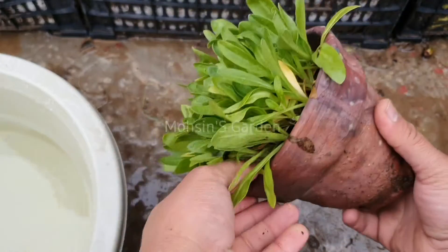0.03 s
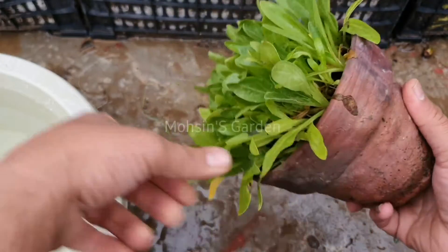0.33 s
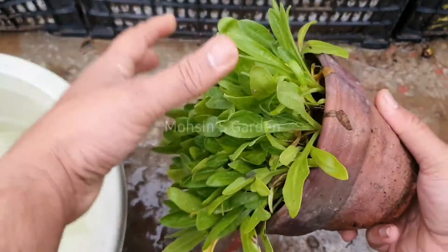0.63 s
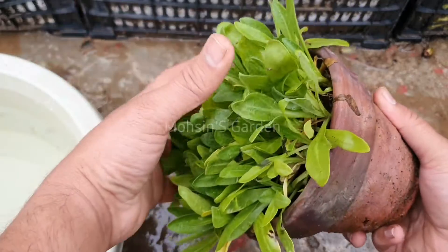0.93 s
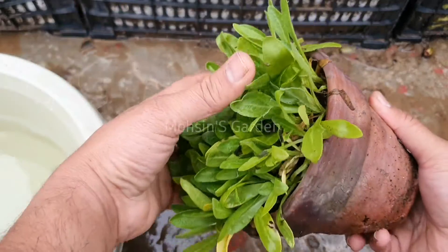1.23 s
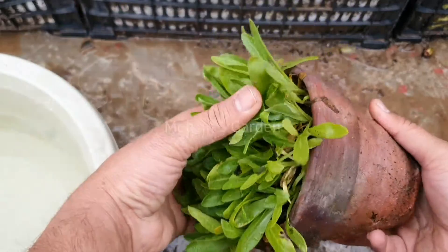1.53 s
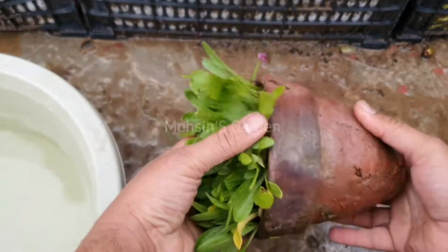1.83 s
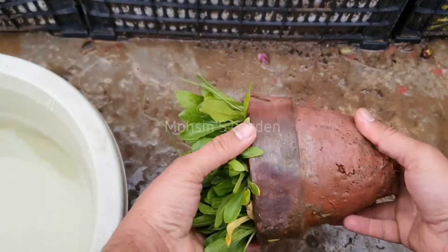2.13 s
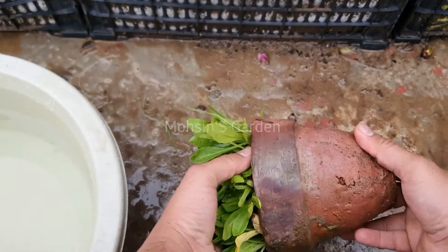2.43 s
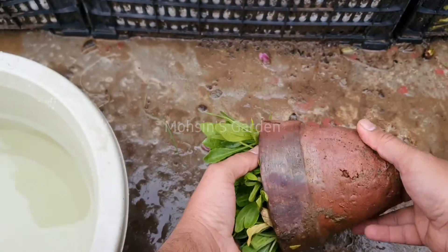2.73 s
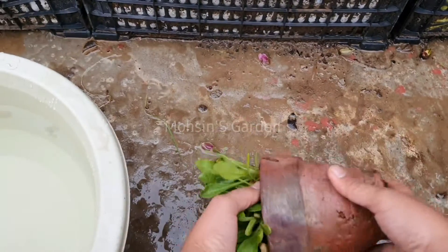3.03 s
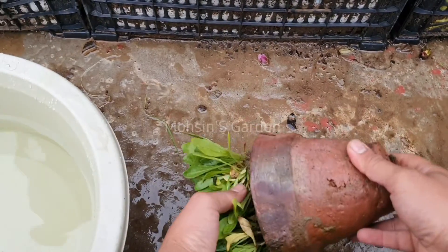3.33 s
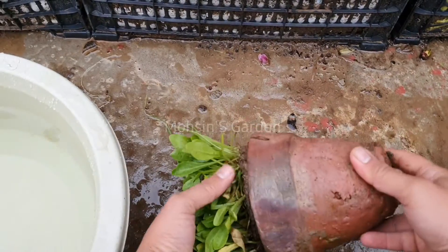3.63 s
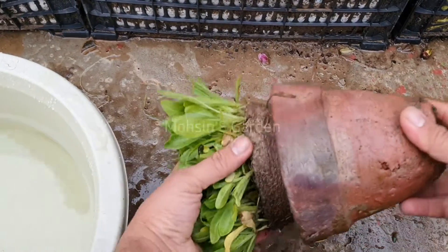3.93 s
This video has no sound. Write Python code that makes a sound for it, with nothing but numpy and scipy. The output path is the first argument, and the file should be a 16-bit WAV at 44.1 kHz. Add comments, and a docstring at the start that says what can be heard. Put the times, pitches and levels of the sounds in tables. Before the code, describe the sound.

A clay pot knocks once on the floor after faint leaf rustling and small taps.

```python
"""A tilted clay pot, close to the microphone in a quiet yard, as a clump of seedlings is eased out of it.
The pot is bumped once on the wet floor and rings, then its rim scrapes as it lifts. Soil crumbs tick,
fingers rub the clay, and leaves rustle and snap in showers of tiny clicks.
A low drone, outdoor air and faint far-off chirps and swells lie behind."""
import sys
import numpy as np
from scipy import signal
from scipy.fft import rfft, irfft
from scipy.io import wavfile

SR = 44100
rng = np.random.default_rng(int(sys.argv[2]) if len(sys.argv) > 2 else 0)


def materialize(psi):
    """Save the field psi as 16-bit PCM at rate SR to the path in sys.argv[1].

    A 1-D psi becomes a single channel; in a 2-D psi each row is a channel.
    """
    bounded = np.clip(np.atleast_2d(psi).T, -1, 1)
    quanta = np.round(bounded * 32767).astype(np.int16)
    wavfile.write(sys.argv[1], SR, quanta)


N = 176400
T = np.arange(N) / SR
FREQS = np.fft.rfftfreq(N, 1 / SR)

# The clay wall's modes; higher ones die sooner. Each row: frequency in Hz, level in dB.
WALL_PARTIALS = [(745, -3.5), (1045, -28.5), (1283, -25.5), (1812, -0.5), (1935, -13), (2135, -8.5),
                 (2700, -10.5), (2975, 1.5), (3260, 3.5), (3820, -5), (4400, -7.5), (4930, -1.5),
                 (6110, -9.5), (6870, -4)]
WALL_MODES = [(hz, db, .078 * (hz / 1000) ** -.36) for hz, db in WALL_PARTIALS]  # adds t60 in seconds
# The hollow, soil-damped body. Each row: frequency in Hz, level in dB, t60 in seconds.
BODY_MODES = [(205, -13.5, 0.047), (286, -1.5, 0.13), (356, 2, 0.052), (395, -6, 0.15), (470, -9.5, 0.2),
              (542, -14.5, 0.116), (706, 4, 0.095), (764, -11.5, 0.056), (946, -9.5, 0.056)]
# The crack of clay on the floor. Each row: frequency in Hz, level in dB.
CRACK_SPECTRUM = [(200, -10), (700, 4.5), (1050, -2.5), (1300, 4.5), (1600, -10.5), (1850, 3), (2100, -3.5),
                  (2450, -10.5), (3050, -5), (4200, -19.5), (10000, -33.5), (16000, -37)]
# The echo coming back from the yard. Each row: frequency in Hz, level in dB.
YARD_SPECTRUM = [(40, -7.5), (120, 1.5), (300, 7), (700, -8), (1200, -19), (3000, -37.5), (16000, -50.5)]
# Blows on the floor. Each row: time in seconds, thud level in dB, ring level in dB, brightness in Hz.
FLOOR_BLOWS = [(2.9091, -2.53, -18.5, 1800), (2.9140, -25.5, -28.5, 3000), (2.9239, -15, -28, 3500),
               (2.9374, -30.5, -25.5, 7000)]
THUD_HZ, THUD_LEAD_S = 352, 0.00149  # the clay touches just ahead of the thud's centre


def pot_bump():
    """Close by, the full pot lands and rocks: a thud, ringing clay, a gritty crack and the yard's echo."""
    thud, push, clink, crack = np.zeros((4, N))
    for s, thud_db, ring_db, bright_hz in FLOOR_BLOWS:
        phase = np.pi * THUD_HZ * (T - s)
        thud += undb(thud_db) * (2 * phase ** 2 + 0.74 * phase - 1) * np.exp(-phase ** 2)
        touch = s - THUD_LEAD_S
        start = int(touch * SR)
        push[start] += undb(thud_db)
        wall = ring([(hz, db - 10 * np.log10(1 + (hz / bright_hz) ** 2), t60)
                     for hz, db, t60 in WALL_MODES])
        clink[start:] += undb(ring_db) * wall[:N - start] / np.abs(wall).max()
        crack += undb(thud_db) * fade(touch, t60=.024) * onset(touch, rise_s=0.00068)
    echo = undb(-26.5) * colour(stereo(noise(), side_db=-7), YARD_SPECTRUM) * fade(0, t60=0.3)
    boom = ring([(126.4, -27.5, 0.51)])
    body = undb(-21) * ring(BODY_MODES) + boom + echo
    grit = colour(stereo(noise(), side_db=0), CRACK_SPECTRUM)
    return (pan(db=-1.5) * (thud + through(push, body)) + undb(-8.5) * pan(db=8.5) * clink
            + undb(-12.5) * crack * grit)


def hollow_knock():
    """The first blow draws a brief knock from the damp clay's many close, damped resonances."""
    touch = FLOOR_BLOWS[0][0] - THUD_LEAD_S
    hollow = stereo_band(hz=751, width_hz=250, side_db=-7)
    return undb(-14) * hollow * fade(touch, t60=0.048) * onset(touch, rise_s=0.0074)


# The rim catching on the floor. Each row: time in seconds, level in dB, rise and fall in seconds.
RIM_CATCHES = [(3.1505, -36.5, 0.0032, 0.0026), (3.162, -28, 0.0022, 0.0016),
               (3.1648, -36.5, 0.0017, 0.0019), (3.1772, -43.5, 0.00064, 0.006)]
# Grit under the rim. Each row: frequency in Hz, level in dB.
GRIT_SPECTRUM = [(300, -18), (1500, 5), (2600, 22), (3500, 24.5), (4300, 21), (5300, 16.5), (8000, 9.5),
                 (16000, 10)]


def rim_scrape():
    """The rim catches on grit; each catch and the clicks around it ring the wall, left of centre."""
    force, catches = np.zeros((2, N))
    for s, db, rise, fall in RIM_CATCHES:
        force += undb(db) * np.exp(-np.maximum((s - T) / rise, (T - s) / fall))
        catches[int(s * SR)] += undb(db - 13)
    clicks = stereo(grains(per_s=4400, spread_db=5), side_db=2)
    wall = ring(WALL_MODES)
    rung = through(catches + undb(-6) * force * clicks / np.linalg.norm(wall), wall)
    return pan(db=6) * rung + close_echo(undb(-4) * force * colour(clicks, GRIT_SPECTRUM))


# Small contacts with the pot. Each row: start in seconds, level in dB, pitch in Hz,
# ring t60 in seconds, then pan, ring level and thump level in dB.
POT_TAPS = [(1.723, -44, 2900, 0.017, 9, 2.5, -31), (2.343, -38.5, 2205, 0.017, 2, -4.5, -19),
            (2.3443, -45, 3100, 0.041, 0, -3.5, -23), (2.585, -46, 890, 0.018, -3, -17, -2),
            (2.6346, -35.5, 1220, 0.032, -3, -8.5, -4), (2.7255, -30, 1226, 0.028, 0.5, -16, -6),
            (2.7336, -36, 1180, 0.083, -5, -11, -7), (3.4379, -38.5, 1390, 0.019, -3, -8, -20.5),
            (3.8441, -37.5, 1470, 0.027, 1.5, -6, -11.5), (3.86, -46.5, 2950, 0.018, 1, -1.5, -11)]
# The crumbly burst of a tap. Each row: multiple of the tap's pitch, level in dB.
CRUMB_SPECTRUM = [(.1, 9), (.45, -0.5), (.7, -1), (1, 8), (1.4, -4.5), (2.4, -4.5), (3.5, -20.5), (12, -55)]


def soil_ticks():
    """Soil and fingers tap the pot at close range: a crumbly burst, a brief ring and a hollow thump."""
    out, grit = 0, stereo(noise(), side_db=-1)
    for s, db, hz, t60, pan_db, ring_db, thump_db in POT_TAPS:
        spectrum = [(multiple * hz, level) for multiple, level in CRUMB_SPECTRUM]
        crumb = undb(-10.5) * fade(s, t60=0.039) * colour(grit, spectrum)
        tone = undb(ring_db) * fade(s, t60) * np.sin(2 * np.pi * hz * (T - s))
        thump = undb(thump_db) * fade(s, t60=0.017) * np.sin(2 * np.pi * 545 * (T - s))
        out += undb(db) * pan(pan_db) * onset(s, rise_s=.0005) * (crumb + tone + thump)
    return out


# The movement of the leaves. Each row: time in seconds, level in dB.
RUSTLE_LEVELS = [(0, -113), (.13, -96), (.19, -78.5), (.68, -77), (.9, -105), (1.17, -126), (1.24, -81),
                 (1.34, -82), (1.385, -65.5), (1.42, -76.5), (1.49, -66), (1.55, -79), (1.655, -61),
                 (1.71, -69.5), (1.79, -65), (1.83, -64.5), (1.86, -60.5), (1.93, -71), (2.0, -63.5),
                 (2.045, -59), (2.08, -73), (2.16, -75), (2.8, -84), (2.9, -61.5), (2.94, -59),
                 (2.98, -69.5), (3.085, -79), (3.12, -61), (3.16, -52), (3.2, -70.5), (3.8, -80.5),
                 (4, -76.5)]
# Crisp snaps of stems and leaves. Each row: start in seconds, level in dB, t60 in seconds.
STEM_SNAPS = [(0.427, -56, 0.025), (0.485, -58.5, 0.029), (0.584, -65, 0.016), (1.38, -59, 0.034),
              (1.387, -52.5, 0.015), (1.497, -56.5, 0.037), (2.644, -57.5, 0.036), (3.439, -49.5, 0.012),
              (3.494, -56.5, 0.017), (3.97, -53.5, 0.015)]
# The rustle and the snaps from close up. Each row: frequency in Hz, level in dB.
RUSTLE_SPECTRUM = [(500, -5), (1500, -4.5), (3000, 2), (4200, 0), (6000, -1.5), (8000, -3), (11500, -2),
                   (14000, -5.5), (16000, -5)]
SNAP_SPECTRUM = [(1000, -3), (3000, -1.5), (6000, 2), (10000, -3.5), (16000, -7.5)]


def leaves():
    """Near the microphone, leaves slide over each other and crackle; now and then one snaps free."""
    fine = colour(stereo(grains(per_s=6000, spread_db=3.2), side_db=1), RUSTLE_SPECTRUM)
    crackle = colour(stereo(grains(per_s=150, spread_db=2.8), side_db=10.5), RUSTLE_SPECTRUM)
    moving = curve(RUSTLE_LEVELS) * flutter(depth_db=1.5)
    crisp = colour(stereo(grains(per_s=14000, spread_db=2.5), side_db=-2.5), SNAP_SPECTRUM)
    snaps = sum(undb(db) * fade(s, t60) for s, db, t60 in STEM_SNAPS)
    return pan(db=1.5) * (close_echo(moving * fine + snaps * crisp) + undb(-3) * moving * crackle)


# Roots, soil and leaves sliding. Each row: midpoint and length in seconds, level in dB, centre in Hz.
CLUMP_SLIDES = [(0.266, 0.054, -75, 3920), (1.227, 0.076, -74, 3800), (1.77, 0.27, -78, 3000),
                (1.77, 0.24, -62, 11400), (1.86, .035, -67, 4300), (2.007, 0.15, -62.5, 13300),
                (1.382, .03, -63.5, 4600)]


def clump_sliding():
    """Leaves brush the hand, then roots and damp soil let go of the clay, each with a fine crackle."""
    out, crackle = 0, stereo(grains(per_s=1500, spread_db=1.5), side_db=-1)
    for s, length, db, hz in CLUMP_SLIDES:
        out += undb(db) * arch(s, length) * resonate(crackle, hz, width_hz=0.75 * hz)
    return close_echo(out)


# The drag on the clay. Each row: time in seconds, level in dB.
RUB_LEVELS = [(0, -77.5), (.9, -79), (1.3, -76.5), (1.6, -75.5), (1.75, -65), (1.93, -75), (2.05, -68),
              (2.25, -63), (2.55, -72), (2.7, -65.5), (2.79, -67.5), (2.87, -60.5), (3.07, -75.5),
              (3.19, -59), (3.3, -67.5), (3.5, -69.5), (3.78, -70), (3.9, -64), (4, -66.5)]
# Rubbed clay from close up. Each row: frequency in Hz, level in dB.
RUB_SPECTRUM = [(200, -14), (600, 5), (950, -8), (1400, 2.5), (2100, -4), (3200, -0.5), (5000, -9),
                (8000, -17), (16000, -21.5)]


def finger_rub():
    """Fingers and soil drag on the clay, which rings a little."""
    clicks = stereo(grains(per_s=12000, spread_db=1.5), side_db=0) * flutter(depth_db=-0.5)
    rung = undb(-17.5) * unit(through(clicks, ring(WALL_MODES)))
    return undb(3) * curve(RUB_LEVELS) * (colour(clicks, RUB_SPECTRUM) + rung)


# Soft bumps of the hands on the pot. Each row: start in seconds, level in dB.
HAND_PUSHES = [(1.47, -48), (1.769, -37.5), (1.806, -39.5)]


def hand_nudges(hz=58.7, rise_s=.012):
    """Each push of the hands gives a few slow, deep swings, well to the right."""
    out = 0
    for s, db in HAND_PUSHES:
        age = np.maximum(T - s, 0)
        out += undb(db) * age / rise_s * np.exp(1 - age / rise_s) * np.sin(2 * np.pi * hz * age)
    return pan(db=-15) * out


# The rumble under the pull. Each row: frequency in Hz, level in dB.
RUMBLE_SPECTRUM = [(20, 9), (40, 1), (62, -3), (90, 10), (125, -6), (170, -2.5), (400, -49), (16000, -92)]


def pull_rumble(peak_s=1.7, width_s=0.41):
    """A low rumble swells on the right while the clump is pulled."""
    swell = undb(-53) * np.exp(-((T - peak_s) / width_s) ** 2)
    return swell * pan(db=-7.5) * colour(stereo(noise(), side_db=-2), RUMBLE_SPECTRUM)


# The quiet of the yard. Each row: frequency in Hz, level in dB.
AIR_SPECTRUM = [(20, -16), (40, -10.5), (66, -1), (92, -9.5), (125, -8), (200, -16), (310, -18),
                (450, -25.5), (800, -32), (1300, -35.5), (1900, -37), (3200, -51.5), (5200, -71.5),
                (9000, -64), (15000, -74)]


def yard_air():
    """Outdoor air all around the microphone, narrow in the bass and wide in the treble."""
    mid, side = colour(noise(), AIR_SPECTRUM)
    side = irfft(rfft(side) * undb(np.interp(FREQS, [200, 1500], [-10.5, 1.5])), N)
    return undb(-53.5) * pan(db=-1) * np.array([mid + side, mid - side])


# The drone behind the pot. Each row: time in seconds, level in dB.
DRONE_LEVELS = [(0, -54), (.7, -56.5), (1.3, -56.5), (1.7, -49.5), (1.9, -59.5), (2.06, -42), (2.35, -55),
                (2.7, -49), (3.38, -47), (3.5, -60), (4, -51.5)]


def low_drone():
    """A narrow band of deep noise wavers, its swings partly evened out."""
    swing = signal.hilbert(band(hz=68.53, width_hz=8.5))
    return pan(db=-3) * curve(DRONE_LEVELS) * unit(swing.real / (np.abs(swing) + 1.85))


# Distant sounds. Each row: midpoint and length in seconds, centre and width in Hz, level in dB.
FAR_SWELLS = [(0.237, 0.39, 1800, 380, -72), (0.582, 0.45, 1270, 322, -64), (0.638, 0.097, 410, 220, -50.5),
              (0.68, 0.25, 562, 200, -58), (0.84, 0.24, 342, 90, -57.5), (1.785, 0.41, 310, 139, -60)]


def far_swells():
    """Faint bands of noise come and go a long way off."""
    return sum(undb(db) * arch(s, length) * stereo_band(hz, width_hz, side_db=-6.5)
               for s, length, hz, width_hz, db in FAR_SWELLS)


# Chirps far from the microphone. Each row: midpoint and length in seconds, pitch in Hz, level in dB.
FAR_CHIRPS = [(0.7, 0.059, 6100, -74), (0.797, 0.065, 5800, -73), (1.082, 0.081, 3600, -74)]


def far_chirps(fall_hz_per_s=15000):
    """Thin notes that fall in pitch, blurred by distance."""
    out = 0
    for s, length, hz, db in FAR_CHIRPS:
        blur = signal.hilbert(stereo_band(hz, width_hz=1000, side_db=-1))
        note = (blur * np.exp(-1j * np.pi * fall_hz_per_s * (T - s) ** 2)).real
        out += undb(db) * arch(s, length) * note
    return out


def close_echo(x):
    """Pot, hands and floor add a dense, very short echo, different in each channel."""
    echo = noise() * fade(0, t60=0.035)
    return x + through(x, echo / np.linalg.norm(echo[0]))


def flutter(depth_db, corner_hz=45):
    """Uneven gain of a contact that sticks and slips."""
    return undb(depth_db * np.clip(band(0, 2 * corner_hz), -2, 2))


def grains(per_s, spread_db):
    """Two streams of random clicks of uneven size."""
    clicks = noise() * (rng.random((2, N)) < per_s / SR)
    return unit(clicks * undb(spread_db * np.minimum(rng.exponential(size=(2, N)), 4)))


def ring(modes):
    """Impulse response of (Hz, dB, t60 in seconds) modes."""
    t = T[:SR]
    rung = sum(undb(db) * np.exp(-np.log(1000) * t / t60) * np.sin(2 * np.pi * hz * t)
               for hz, db, t60 in modes)
    return np.pad(rung, (0, N - len(rung)))


def through(x, response):
    """Convolve, channel by channel."""
    return signal.fftconvolve(np.atleast_2d(x), np.atleast_2d(response), axes=1)[:, :N]


def colour(x, points):
    """Shape x by (Hz, dB) points; rms 1."""
    hz, db = np.array(points).T
    return unit(irfft(rfft(x) * undb(np.interp(np.log(FREQS + 1), np.log(hz), db)), N))


def resonate(x, hz, width_hz):
    """Pass x through one steep resonance; rms 1."""
    return unit(irfft(rfft(x) / (1 + (2 * (FREQS - hz) / width_hz) ** 2), N))


def noise():
    """Unrelated white noise left and right."""
    return rng.standard_normal((2, N))


def band(hz, width_hz):
    """Noise in one resonance."""
    return resonate(rng.standard_normal(N), hz, width_hz)


def stereo_band(hz, width_hz, side_db):
    """A noise band spread between left and right."""
    return stereo([band(hz, width_hz), band(hz, width_hz)], side_db)


def stereo(pair, side_db):
    """Use two signals as mid and side; rms 1."""
    return unit(pair[0] + undb(side_db) * pair[1] * np.array([[1], [-1]]))


def pan(db):
    """Left and right gains for a level difference; positive is left."""
    return undb(np.array([[db], [-db]]) / 2)


def curve(rows):
    """Gain over time from (seconds, dB) points."""
    return undb(np.interp(T, *np.array(rows).T))


def onset(start, rise_s):
    """Straight rise from 0 to 1."""
    return np.clip((T - start) / rise_s, 0, 1)


def fade(start, t60):
    """Sudden start, then a fall of 60 dB in t60 seconds."""
    return (T >= start) * np.exp(-np.log(1000) * np.clip((T - start) / t60, 0, 10))


def arch(midpoint, length):
    """Half-cosine swell."""
    return np.cos(np.pi * np.clip((T - midpoint) / length, -.5, .5))


def undb(db):
    """Decibels to gain."""
    return 10 ** (np.asarray(db) / 20)


def unit(x):
    """Scale to rms 1."""
    return x / np.sqrt(np.mean(x ** 2))


def scene():
    """The pot and seedlings up close, the yard behind."""
    pot = pot_bump() + hollow_knock() + rim_scrape() + soil_ticks()
    pulling = leaves() + clump_sliding() + finger_rub() + hand_nudges() + pull_rumble()
    return pot + pulling + yard_air() + low_drone() + far_swells() + far_chirps()


def record(dry):
    """The recorder cuts the top above 15.8 kHz."""
    return signal.sosfilt(signal.ellip(10, .2, 80, 15800, fs=SR, output="sos"), dry)


dry = scene()
out = record(dry)
materialize(out)
```